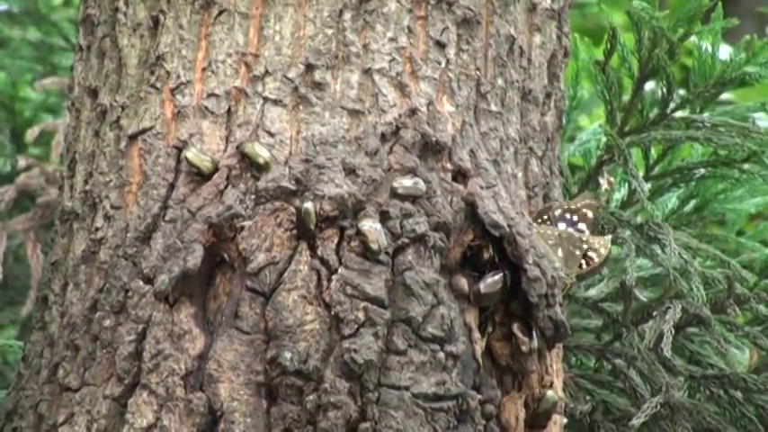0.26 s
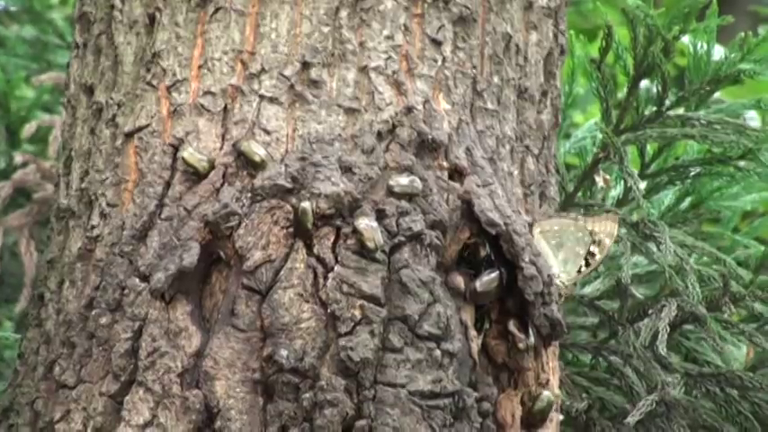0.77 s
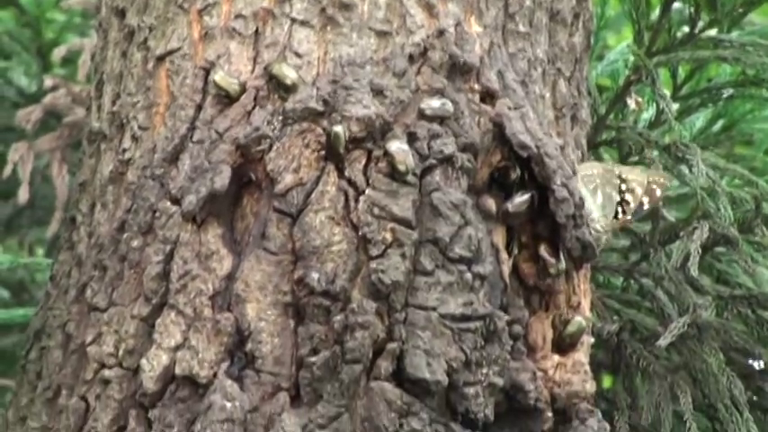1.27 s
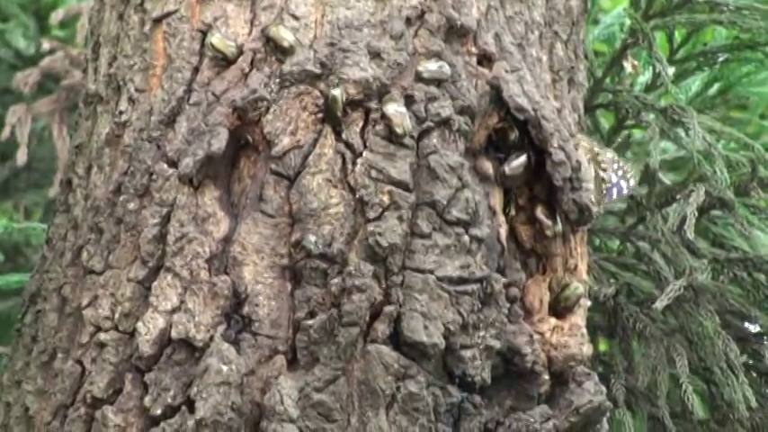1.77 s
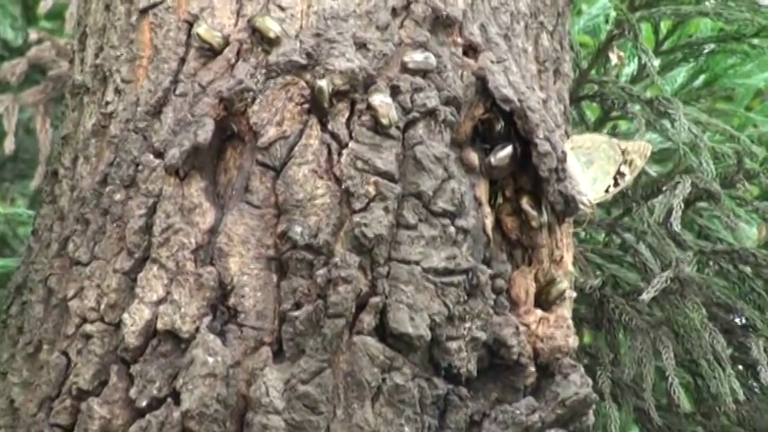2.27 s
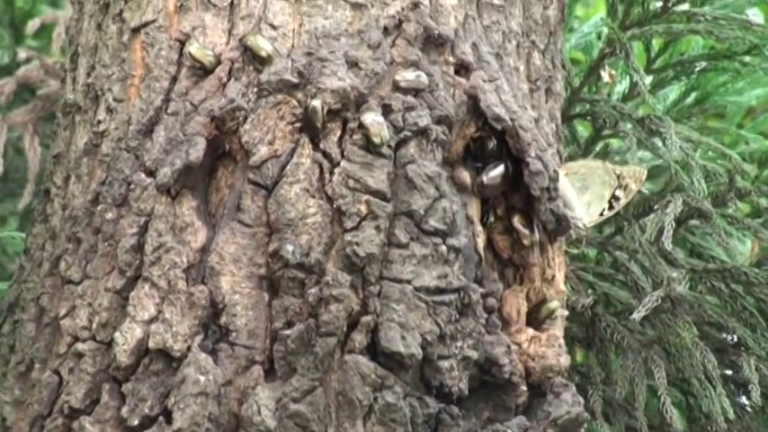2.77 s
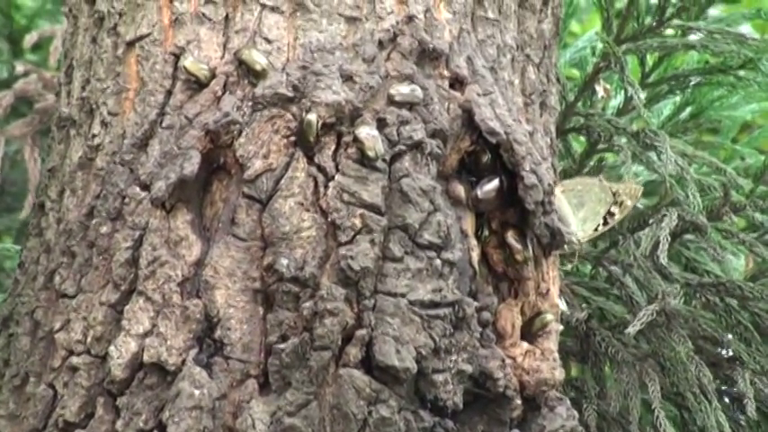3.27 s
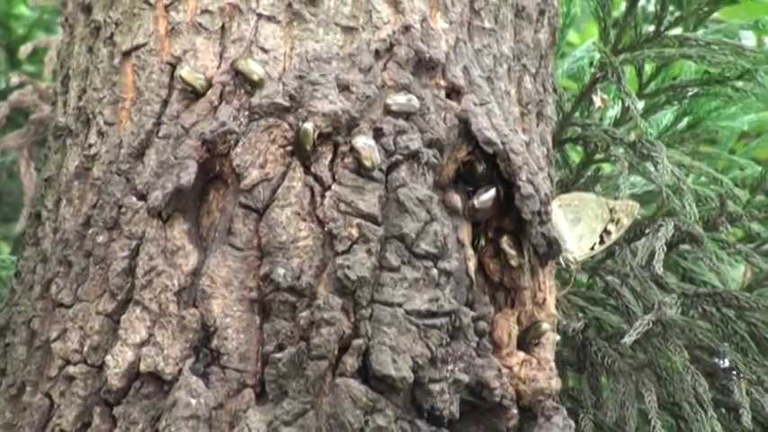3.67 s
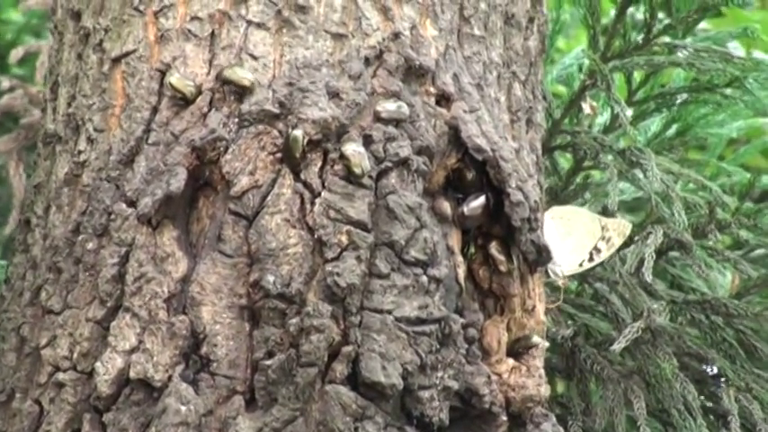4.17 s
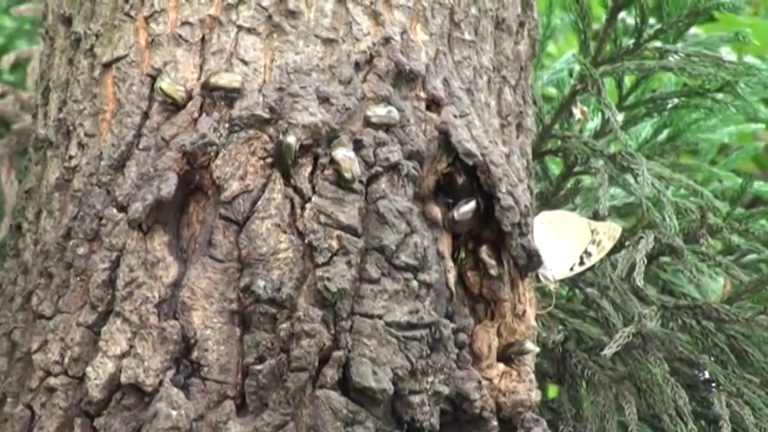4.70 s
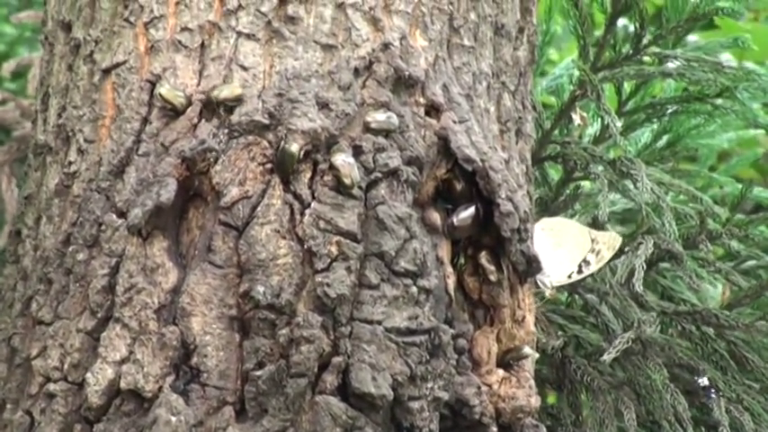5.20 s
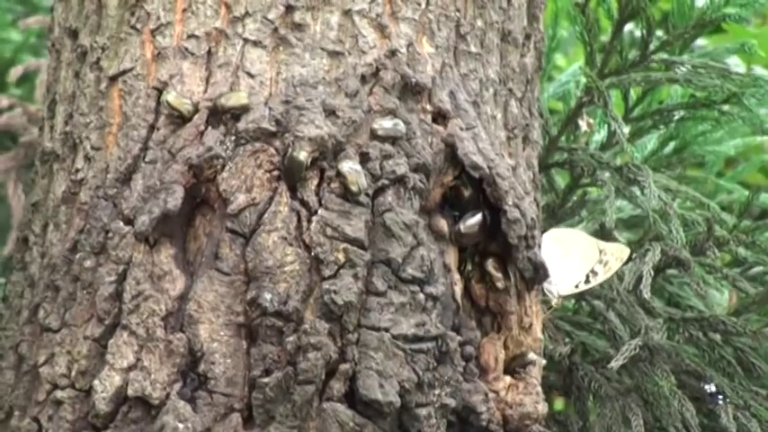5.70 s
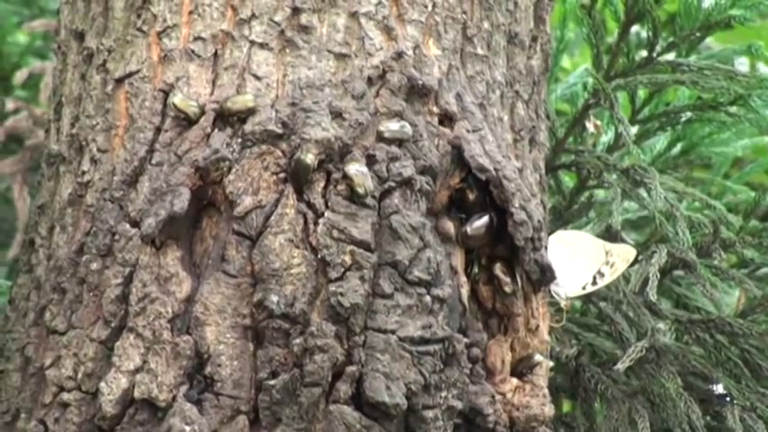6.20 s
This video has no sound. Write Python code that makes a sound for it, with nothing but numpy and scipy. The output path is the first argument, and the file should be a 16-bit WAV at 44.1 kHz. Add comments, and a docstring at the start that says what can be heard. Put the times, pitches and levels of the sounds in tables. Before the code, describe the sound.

A bright, continuous cicada chorus dominates, with single singers briefly standing out. In the first second a vehicle passes with a low drone and rushing tyre noise, leaving a dull hiss. A faint cricket trills underneath and far engines hum. Midway the lower cicadas hush and the main chorus grows slightly. Near the end an engine coasts down and stalls with a soft shudder. Outdoor stereo from a close microphone pair.

```python
"""From the start cicadas drone in the trees: crowds of clicks, shaped in colour, with a few single singers.
A faint cricket trills under them in short ringing notes; a far engine and an idling one hum as stacks of sines.
A vehicle passes in the first second, a droning motor and rushing noise, and leaves a dull hiss behind it.
Midway the lower cicadas hush and the main chorus grows. Near the end the far engine is switched off, coasts
down and stalls with a shudder, while the idling one sags. A close pair of microphone ports hears it outdoors."""
import sys
import numpy as np
from scipy import signal
from scipy.fft import rfft, irfft, next_fast_len
from scipy.io import wavfile

SR = 44100
rng = np.random.default_rng(int(sys.argv[2]) if len(sys.argv) > 2 else 0)


def dump(signal):
    """Clip the signal to [-1, 1] and save it as 16-bit WAV at the path in sys.argv[1]."""
    limited = np.clip(np.atleast_2d(signal).T, -1, 1)
    pcm = np.round(limited * 32767).astype(np.int16)
    wavfile.write(sys.argv[1], SR, pcm)


N = 284445
SIZE = next_fast_len(N + SR)   # FFT length, with spare room after the sound


def from_db(db):
    """Turn dB into gain."""
    return 10 ** (np.asarray(db) / 20)


def rms_one(x):
    """Scale to rms 1."""
    return x / np.sqrt(np.mean(x ** 2) + 1e-20)


def seconds_after(s):
    """Time gone by since s; zero before."""
    return np.maximum(np.arange(N) / SR - s, 0)


def ramp(start_s, end_s):
    """0 before, 1 after, straight between."""
    return np.minimum(seconds_after(start_s) / max(end_s - start_s, 1 / SR), 1)


def fading(start_db, fade_db_per_s):
    """A level that sinks steadily, in dB."""
    return start_db - fade_db_per_s * seconds_after(0)


def level_in_time(rows):
    """Level of a (time, level) table at every sample, straight between its rows."""
    time_s, level_db = np.transpose(rows)
    return np.interp(np.arange(N) / SR, time_s, level_db)


def at_hz(rows, column=1):
    """A column of a table over the FFT bins, straight on a log-frequency axis."""
    hz = np.maximum(np.arange(SIZE // 2 + 1) * SR / SIZE, 1)
    table = np.array(rows)
    return np.interp(np.log(hz), np.log(table[:, 0]), table[:, column])


def colour(x, spectrum):
    """Filter x by the spectrum, silent outside it; rms 1."""
    hz = np.arange(SIZE // 2 + 1) * SR / SIZE
    inside = (hz > spectrum[0][0]) & (hz < spectrum[-1][0])
    shaped = rfft(x, SIZE) * from_db(at_hz(spectrum)) * inside
    return rms_one(irfft(shaped, SIZE)[..., :N])


def drift(rate, count=1):
    """Slow chance, about rate changes a second; spread 1."""
    r = np.exp(-2 * np.pi * rate / SR)
    white = rng.standard_normal((count, N + SR))
    slow = signal.lfilter([1], [1, -2 * r, r * r], white)[:, SR:]   # drop the filter's first second
    return slow / slow.std(axis=1, keepdims=True)


def noise():
    """Two unrelated white noises: one straight, one scattered by leaves and trunks."""
    return rng.standard_normal((2, N))


def rush(level_db, spectrum):
    """Noise of one colour at a level that may move."""
    return from_db(level_db) * colour(noise(), spectrum)


def orders(hz, table, waver_db):
    """Sines at multiples of a shaft rate; the air on the way makes each waver."""
    turn = 2 * np.pi * np.cumsum(hz) / SR
    wavers = drift(3.0, count=len(table))
    starts = rng.uniform(0, 2 * np.pi, len(table))
    total = np.zeros(N)
    for (multiple, db), waver, start in zip(table, wavers, starts):
        total += np.sqrt(2) * from_db(db + waver_db * waver) * np.sin(multiple * turn + start)
    return total * [[1], [0]]   # tones come straight, with no scattered part


def tymbals(low_per_s, high_per_s, jitter, count):
    """Many insects, each buckling its ribs at its own rate, in two unrelated crowds of count each."""
    out = np.zeros((2, N))
    for k in range(2 * count):
        rate = rng.uniform(low_per_s, high_per_s)
        gaps = (1 + jitter * rng.standard_normal(int(N / SR * 600))) / rate
        at = (np.cumsum(gaps) * SR).astype(int)
        signs = rng.choice([-1, 1], len(at))
        np.add.at(out[k % 2], at[at < N], signs[at < N])
    return out


def narrow_band(hz, blur_hz):
    """Noise around a moving pitch, blurred at the rate blur_hz; rms 1."""
    turn = 2 * np.pi * np.cumsum(hz) / SR
    a, b = drift(blur_hz, count=2)
    return a * np.cos(turn) + b * np.sin(turn)


# colour of the main chorus: (frequency [Hz], relative level per Hz [dB])
CHORUS_COLOUR = [(4600, -26.5), (5100, -31.5), (5500, -24), (5900, -17.5), (6900, -9.5), (7700, 0),
                 (8100, 1), (8700, -1), (9600, -11), (10800, -25.5), (11250, -33), (11300, -32)]
# colour of the lower cicadas: (frequency [Hz], relative level per Hz [dB])
LOW_CICADA_COLOUR = [(4800, -21), (5500, -8.5), (6200, 1), (6700, 3.5), (7200, 7), (7700, -21)]
# singers whose pitch stands out: (start [s], end [s], first pitch [Hz], last pitch [Hz], level [dB])
SINGERS = [(0.253, 1.4, 6520, 6500, -47), (1.551, 2.2, 6100, 6270, -54), (1.902, 2.554, 6930, 7100, -44),
           (2.452, 3.801, 8250, 7900, -44), (3.699, 4.6, 5970, 6070, -57), (3.893, 5.202, 8220, 8100, -46),
           (5.202, 6.451, 7550, 7700, -52), (5.303, 6.453, 8000, 7940, -52)]
# the lower cicadas hush and the main chorus grows in their place
HUSH_S, HUSHED_S = 2.44, 2.44 + 0.24
CHORUS_DB, CHORUS_GAIN_DB = -30.5, 0.9   # level once grown, and by how much it grew
LOW_DB, LOW_DROP_DB, LOW_FADE_DB_PER_S = -40, 5.5, 1   # the fade follows the hush


def cicadas():
    """Click crowds ring in the abdomen's broad resonance; a few singers keep a narrow pitch."""
    t, hush = np.arange(N) / SR, ramp(HUSH_S, HUSHED_S)
    main_db = CHORUS_DB - CHORUS_GAIN_DB * (1 - hush) + 0.46 * drift(19)
    low_db = LOW_DB - LOW_DROP_DB * hush - LOW_FADE_DB_PER_S * seconds_after(HUSHED_S)
    out = from_db(main_db) * colour(tymbals(150, 500, jitter=.1, count=140), CHORUS_COLOUR)
    out += from_db(low_db) * colour(tymbals(150, 500, jitter=.12, count=40), LOW_CICADA_COLOUR)
    for start, end, first_hz, last_hz, db in SINGERS:
        swell = np.clip(np.minimum(t - start, end - t) / 0.079, 0, 1)
        pitch_hz = np.interp(t, [start, end], [first_hz, last_hz])
        out += from_db(db) * swell * narrow_band(pitch_hz, blur_hz=40)   # uneven clicks blur the pitch
    return out


# loudness of the cricket: (time [s], level [dB])
CRICKET_LEVEL = [(1.5, -64), (2.5, -61), (4.6, -59.5), (5.6, -60), (6.45, -71)]
CRICKET_HZ, RING_T60_S = 3407, 0.027   # note, and time for one resonator to fall 60 dB
STROKES_PER_S, STROKE_WANDER = 27.03, .05   # wander: strokes early or late, in periods


def cricket():
    """Each wing stroke rings one short note; strokes differ in strength."""
    cycles = STROKES_PER_S * seconds_after(0) + STROKE_WANDER * drift(6)[0]
    stroke_count = np.floor(np.maximum.accumulate(cycles))
    strokes = np.diff(stroke_count, prepend=0) * from_db(2 * drift(14)[0])
    r, w = from_db(-60 / (RING_T60_S * SR)), 2 * np.pi * CRICKET_HZ / SR
    note = strokes + 1e-18
    for _ in range(2):   # the scraper builds the note up, then it dies
        note = signal.lfilter([np.sin(w)], [1, -2 * r * np.cos(w), r * r], note)
    return from_db(level_in_time(CRICKET_LEVEL)) * rms_one(note)


# resonances of the exhaust pipe: (frequency [Hz], width [Hz], level [dB])
EXHAUST = [(151, 150, -6), (280, 148, -9.5), (475, 186, -13), (664, 191, -2.5), (1090, 635, -11)]


def pipe(x):
    """The exhaust pipe's resonances, each applied twice, side by side with alternating sign."""
    out = 0
    for k, (hz, width_hz, db) in enumerate(EXHAUST):
        r = np.exp(-np.pi * width_hz / SR)
        b = (1 - r * r) / 2 * np.array([1, 0, -1])
        a = [1, -2 * r * np.cos(2 * np.pi * hz / SR), r * r]
        ringing = signal.lfilter(b, a, signal.lfilter(b, a, x))
        out = out + (-1) ** k * from_db(db) * ringing
    return out


# tones of the far engine: (multiple of the firing rate, level before the pipe [dB])
ENGINE_ORDERS = [(1, -10), (2, 7), (3, -7), (4, -6.5), (5, 0.5), (6, 9), (7, -1), (8, 2.5), (9, 1),
                 (10, -6.5), (11, 0.5), (13, -6.5)]
# colour of the shudder: (frequency [Hz], relative level per Hz [dB])
THUD_COLOUR = [(120, -9), (250, 11), (450, -17), (900, 5), (1200, -5), (2200, -21.5)]
# the engine runs at a governed speed, is switched off, coasts down and stalls
RUN_HZ, OFF_S, COAST_S, STALL_S = 82.7, 5.07, 1.8, 5.44   # firing rate; falls to 1/e in COAST_S
TONE_DB, TONE_DROP_DB, STALL_DB_PER_S = -45.5, 2.5, 150   # level into the pipe, drop at off, fade at stall
LOW_ORDERS_DROP_DB = 4.5   # once firing ends, orders up to the sixth lose this much more
PUFF_DB, PUFF_DROP_DB, PUFF_FADE_DB_PER_S = -41.5, 3, 9.5   # drop when switched off, fade after the stall
THUD_DB, THUD_RISE_S, THUD_END_S = -43.5, 0.071, 0.038   # rises before the stall, over this long after it


def engine():
    """Firing orders and exhaust puffs ring in the pipe; falling orders light up as they cross a resonance."""
    hz, off = RUN_HZ * np.exp(-seconds_after(OFF_S) / COAST_S), ramp(OFF_S, OFF_S + 0.22)
    stalled = seconds_after(STALL_S)
    tone_db = TONE_DB - TONE_DROP_DB * off - STALL_DB_PER_S * stalled
    puff_db = PUFF_DB - PUFF_DROP_DB * off - PUFF_FADE_DB_PER_S * stalled
    low = from_db(-LOW_ORDERS_DROP_DB * off) * orders(hz, ENGINE_ORDERS[:6], waver_db=0.83)
    uneven_hz = hz + 0.599 * drift(25)[0]   # uneven firing roughens the high orders
    high = orders(uneven_hz, ENGINE_ORDERS[6:], waver_db=1.9)
    puffs = noise() * (1 + .15 * np.cos(2 * np.pi * np.cumsum(hz) / SR))
    out = from_db(tone_db) * pipe(low + high) + from_db(puff_db) * rms_one(pipe(puffs))
    thud_end = STALL_S + THUD_END_S
    shudder = ramp(STALL_S - THUD_RISE_S, STALL_S) - ramp(thud_end - .015, thud_end)
    return out + shudder * rush(THUD_DB, THUD_COLOUR)


# tones of the idling engine: (multiple of IDLE_HZ, relative level [dB])
IDLE_ORDERS = [(.25, -16), (.5, -9.5), (.75, -5), (1, 0), (1.25, -12.5)]
IDLE_HZ, IDLE_DB, IDLE_FADE_DB_PER_S = 108.4, -47, 0.64
SAG_S, SAG_HZ_PER_S, SAG_DB_PER_S = 5.4, 6.8, 8


def idling_engine():
    """Wavering tones of a second engine, which sags in pitch and level at the end."""
    sag = seconds_after(SAG_S)
    level_db = fading(IDLE_DB, IDLE_FADE_DB_PER_S) - SAG_DB_PER_S * sag
    return from_db(level_db) * orders(IDLE_HZ - SAG_HZ_PER_S * sag, IDLE_ORDERS, waver_db=1.0)


# loudness of the low hum, which returns at the end: (time [s], level [dB])
HUM_LEVEL = [(.4, -50.5), (1.2, -63), (5.2, -63), (5.6, -56), (6.45, -52.5)]


def hum():
    """One low tone whose pitch and strength waver."""
    pitch_hz = 287 + 3.99 * drift(7.02)[0]
    return from_db(level_in_time(HUM_LEVEL)) * orders(pitch_hz, [(1, 0)], waver_db=2.5)


# colour of the rumble in the ground: (frequency [Hz], relative level per Hz [dB])
GROUND_COLOUR = [(8, -20), (22, -8), (36, 0), (50, -2), (70, -20)]


def ground_rumble():
    """Steady, very deep noise."""
    return rush(-62, GROUND_COLOUR)


# colour of the far road's rumble: (frequency [Hz], relative level per Hz [dB])
RUMBLE_COLOUR = [(35, -20), (60, -5), (100, -3.5), (200, -5), (290, 2), (400, -4), (700, -3.5), (1300, -9),
                 (2200, -18.5)]


def road_rumble():
    """Low noise of a far road, thinning slowly."""
    return rush(fading(start_db=-44.3, fade_db_per_s=0.42), RUMBLE_COLOUR)


# colour of the hiss of the far road and the engine: (frequency [Hz], relative level per Hz [dB])
HISS_COLOUR = [(500, -42), (900, -5.5), (1300, -5.5), (1900, -2), (2500, -5.5), (3500, -7), (4500, -10.5),
               (5400, -13.5), (7000, -22)]


def road_and_engine_hiss():
    """Higher noise of the far road and the engine, thinning slowly and sinking 2 dB more as the engine winds
    down."""
    level_db = fading(start_db=-44.5, fade_db_per_s=0.38) - 2 * ramp(4.7, 5.8)
    return rush(level_db, HISS_COLOUR)


# colour of the thin hiss at the top: (frequency [Hz], relative level per Hz [dB])
TOP_COLOUR = [(11250, -2), (11400, 6.5), (12500, 2.5), (13500, 0.5), (14500, -4), (15900, -8)]


def top_hiss():
    """Steady, thin, very high noise."""
    return rush(-56.5, TOP_COLOUR)


# the vehicle comes clear of cover, stays near, then drives off
CLEAR_S, NEAR_S, AWAY_S = 0.37, 0.647, 0.92


def passing(near_db, cover_db, fade_db_per_s):
    """Level in dB of one sound of the vehicle: cover_db lower behind cover, fading as it drives off."""
    return near_db - cover_db * (1 - ramp(CLEAR_S, NEAR_S)) - fade_db_per_s * seconds_after(AWAY_S)


# tones of the vehicle's motor: (multiple of the firing rate, relative level [dB])
PASSING_ORDERS = [(1, -1), (2, -12), (3, -6), (4, -17)]
COMING_HZ, GOING_HZ = 72, 70.25   # firing rate as heard
MOTOR_FAR_DB, MOTOR_GONE_S, MOTOR_GONE_DB_PER_S = -54, 4.7, 5


def vehicle_motor():
    """Firing tones that drop in pitch on passing; the drone carries from far, then sinks."""
    hz = COMING_HZ + (GOING_HZ - COMING_HZ) * ramp(NEAR_S, AWAY_S)
    near_db = passing(near_db=-44.5, cover_db=2.1, fade_db_per_s=6)
    far_db = MOTOR_FAR_DB - MOTOR_GONE_DB_PER_S * seconds_after(MOTOR_GONE_S)
    return from_db(np.maximum(near_db, far_db)) * orders(hz, PASSING_ORDERS, waver_db=0.6)


# colour of the vehicle's roar: (frequency [Hz], relative level per Hz [dB])
ROAR_COLOUR = [(40, -32), (70, -7), (130, -13), (190, -8), (330, -6.5), (480, -6.5), (620, -9), (800, -7),
               (1100, -10.5), (1800, -20), (3000, -34)]


def vehicle_roar():
    """Broad low noise of the passing vehicle."""
    return rush(passing(near_db=-37, cover_db=3.5, fade_db_per_s=15), ROAR_COLOUR)


# colour of the tyres: (frequency [Hz], relative level per Hz [dB])
TYRE_COLOUR = [(800, -12), (1200, -3), (1900, 1), (2800, -6), (4100, -5.5), (4900, -8), (5600, -10),
               (7000, -25)]


def vehicle_tyres():
    """Brighter tyre noise, which dies away fastest."""
    return rush(passing(near_db=-40, cover_db=6.2, fade_db_per_s=42), TYRE_COLOUR)


# colour of the vehicle's sizzle: (frequency [Hz], relative level per Hz [dB])
SIZZLE_COLOUR = [(9000, -11), (11300, -5), (12000, 3), (13000, 2), (14200, -2), (15900, -6)]


def vehicle_sizzle():
    """Very high noise of the passing vehicle."""
    return rush(passing(near_db=-52, cover_db=5.2, fade_db_per_s=18), SIZZLE_COLOUR)


# colour of the wash: (frequency [Hz], relative level per Hz [dB])
WASH_COLOUR = [(700, -20), (1100, -2), (1700, -1.5), (2300, -10.5), (3000, -13.5), (4000, -14),
               (5000, -15.5), (6000, -30)]
WASH_FROM_S, WASH_FULL_S, WASH_UNTIL_S = 0.56, 1.04, 1.64
WASH_DB, WASH_RISE_DB, WASH_FADE_DB_PER_S = -41, 23, 15.5


def wash():
    """The dull hiss the vehicle leaves behind it: it swells, holds and fades."""
    rise_db = WASH_RISE_DB * (ramp(WASH_FROM_S, WASH_FULL_S) - 1)
    fade_db = WASH_FADE_DB_PER_S * seconds_after(WASH_UNTIL_S)
    return rush(WASH_DB + rise_db - fade_db, WASH_COLOUR)


# microphone pair, for a source with aside = 1:
# (frequency [Hz], left-right likeness [0-1], left over right [dB], left lead [rad])
PAIR = [(30, .99, .2, .07), (100, .99, -.3, .2), (170, .985, -.5, .29), (300, .95, -3.6, .45),
        (500, .91, -6, .58), (750, .89, -5.4, .85), (1100, .57, -3.8, .35), (2000, .65, -3, .45),
        (2800, .75, -2.4, .5), (4400, .88, -1.9, 0), (7500, .86, -2, -.15), (9600, .83, -1.7, -.3),
        (10900, .9, -1, -.1), (11350, .997, 0, 0)]


def ports(x, aside):
    """Spectra at both ports: the further aside a source, the more they differ in level, phase and scatter."""
    straight, scattered = rfft(x, SIZE)
    unlike = np.clip((1 - at_hz(PAIR, column=1)) * aside, 0, 1)
    louder = from_db(aside * at_hz(PAIR, column=2) / 2)
    tilt = louder * np.exp(.5j * aside * at_hz(PAIR, column=3))   # half for each port
    mid, side = np.sqrt(1 - unlike / 2) * straight, 1j * np.sqrt(unlike / 2) * scattered
    return np.array([(mid + side) * tilt, (mid - side) / tilt])


def moving(x, first_aside, last_aside):
    """A source whose bearing slides steadily, by crossfading from one side angle to another."""
    slide = ramp(0, N / SR)
    return ports(x * (1 - slide), first_aside) + ports(x * slide, last_aside)


def scene():
    """Every source reaches the two ports from its own side; engines, hum and road slide in bearing."""
    both = ports(cicadas() + cricket() + top_hiss() + vehicle_sizzle(), aside=1)
    both += moving(engine(), first_aside=1.2, last_aside=0.96)
    motors = idling_engine() + hum() + ground_rumble() + vehicle_motor()
    both += moving(motors, first_aside=1.8, last_aside=.15)
    both += moving(road_rumble(), first_aside=.9, last_aside=0.25)
    both += moving(road_and_engine_hiss(), first_aside=1.4, last_aside=1.56)
    both += ports(vehicle_roar() + vehicle_tyres(), aside=1.26)
    both += ports(wash(), aside=0.13)
    return irfft(both, SIZE)[:, :N]


def record(dry):
    """Cut the top steeply above 15760 Hz."""
    steep_cut = signal.ellip(14, .3, 80, 15760, fs=SR, output="sos")   # order, ripple dB, stop dB, Hz
    return signal.sosfilt(steep_cut, dry)


dry = scene()
out = record(dry)
dump(out)
```